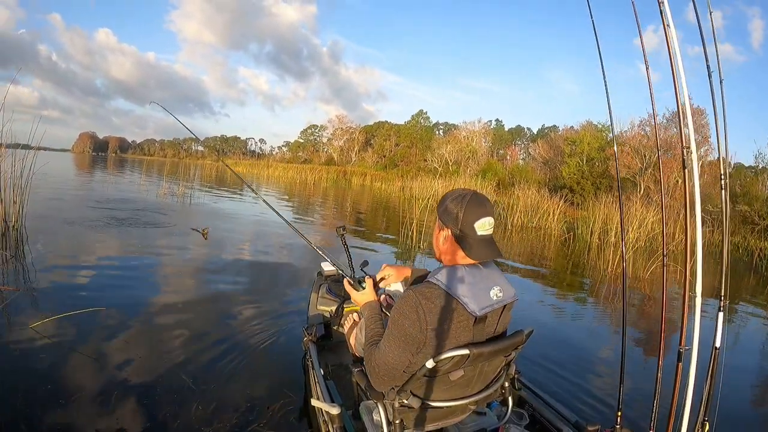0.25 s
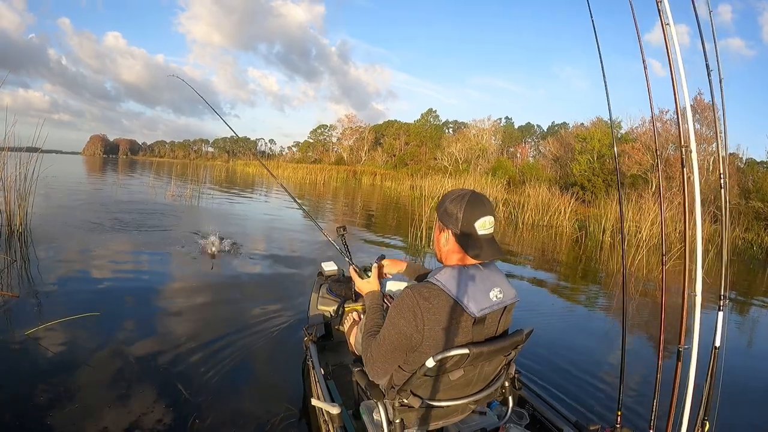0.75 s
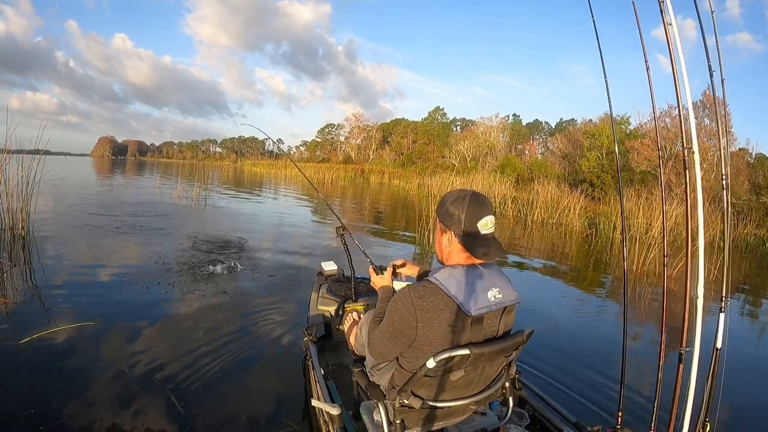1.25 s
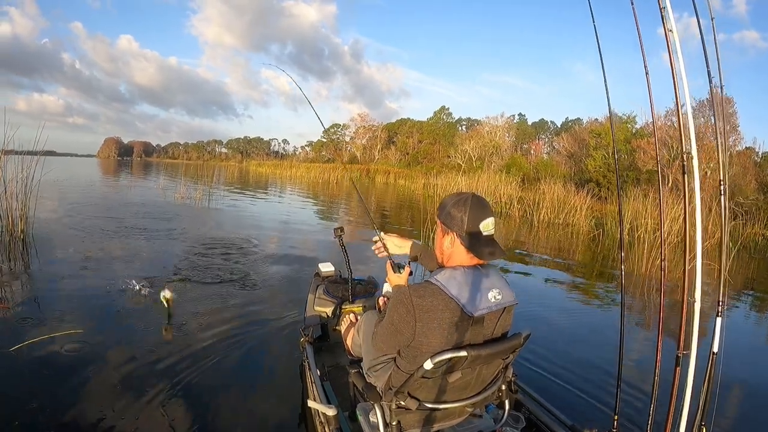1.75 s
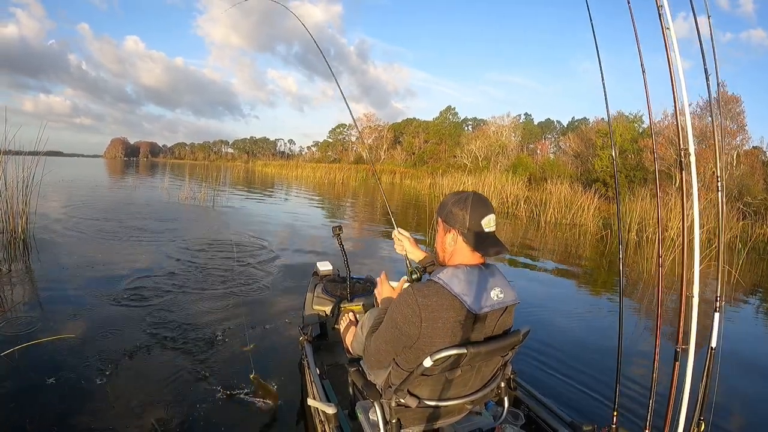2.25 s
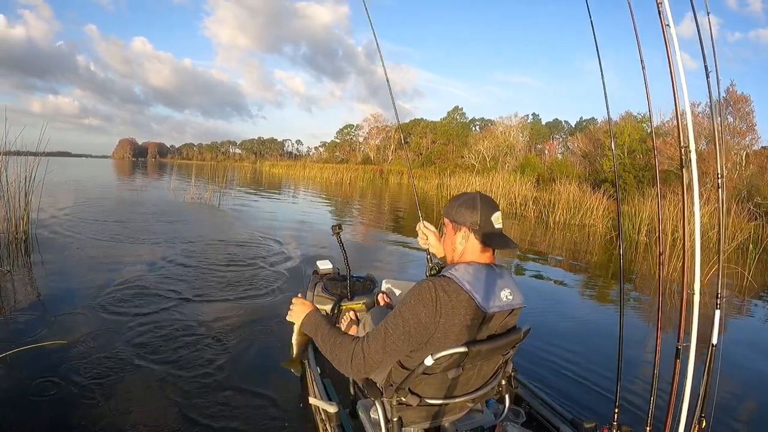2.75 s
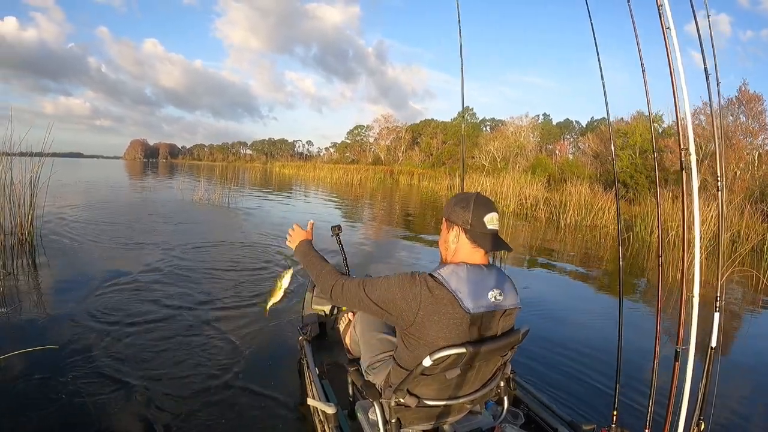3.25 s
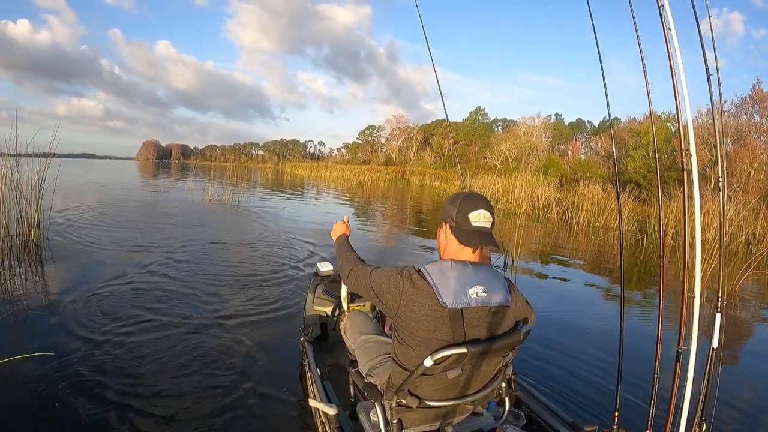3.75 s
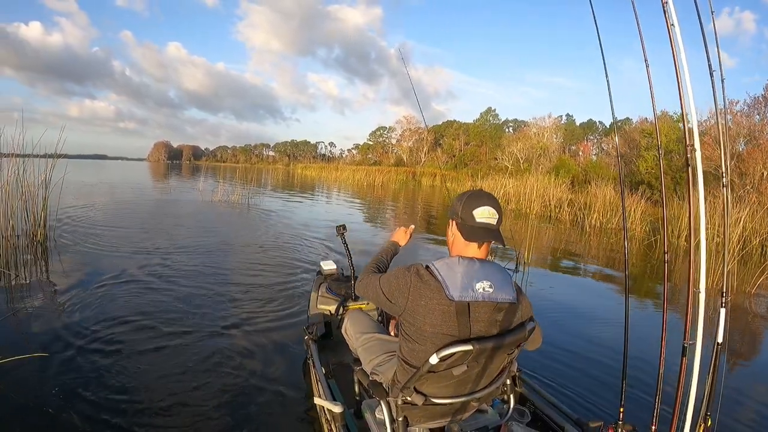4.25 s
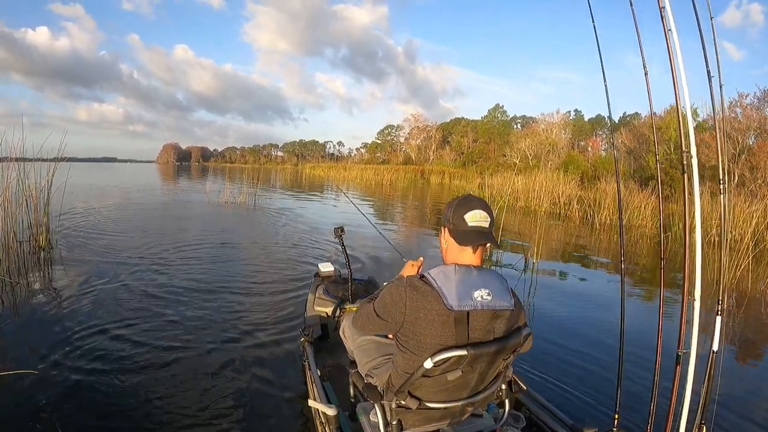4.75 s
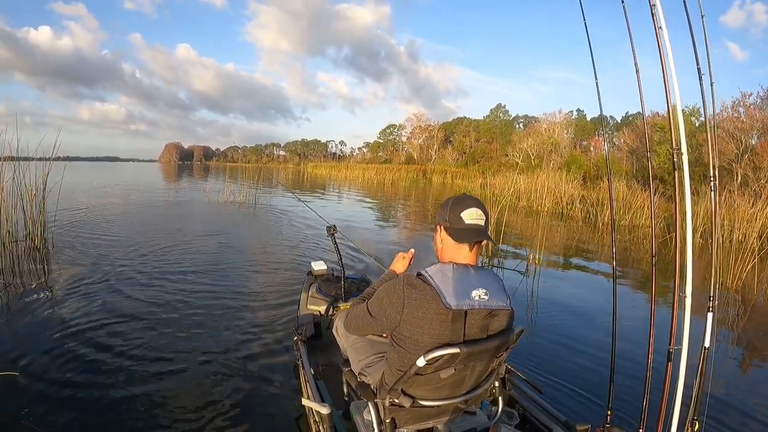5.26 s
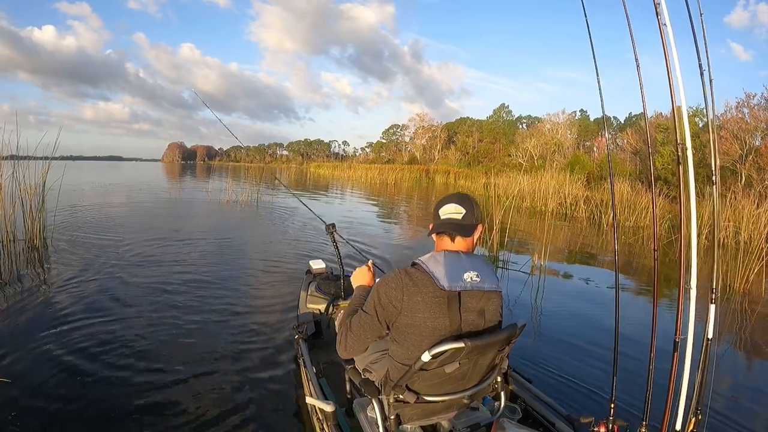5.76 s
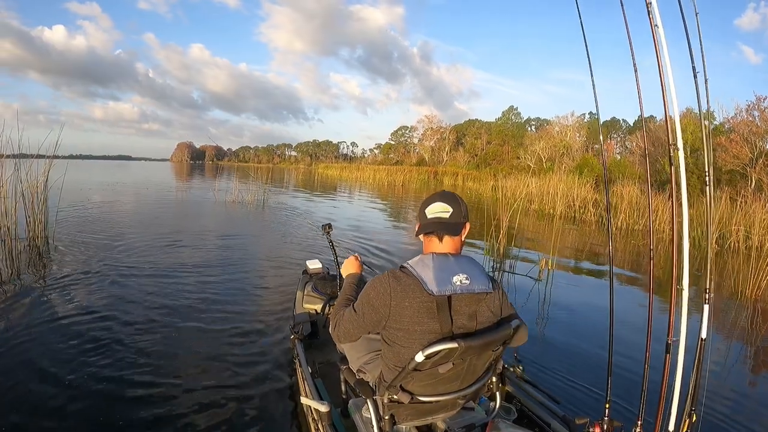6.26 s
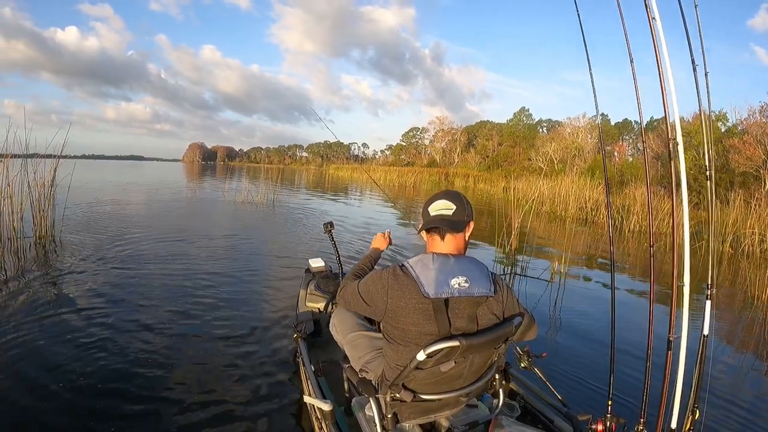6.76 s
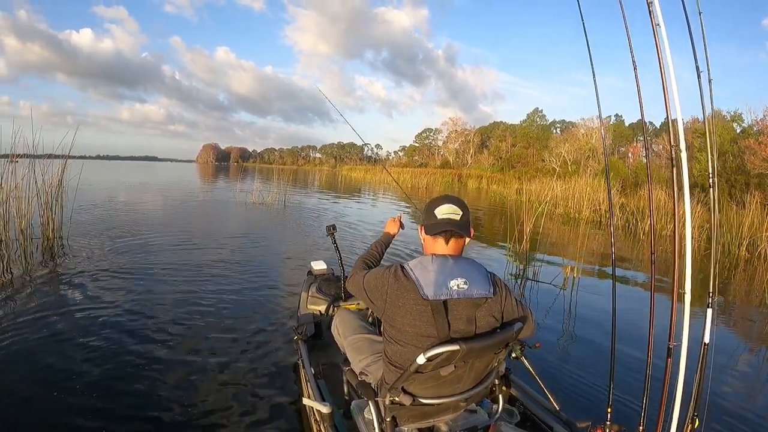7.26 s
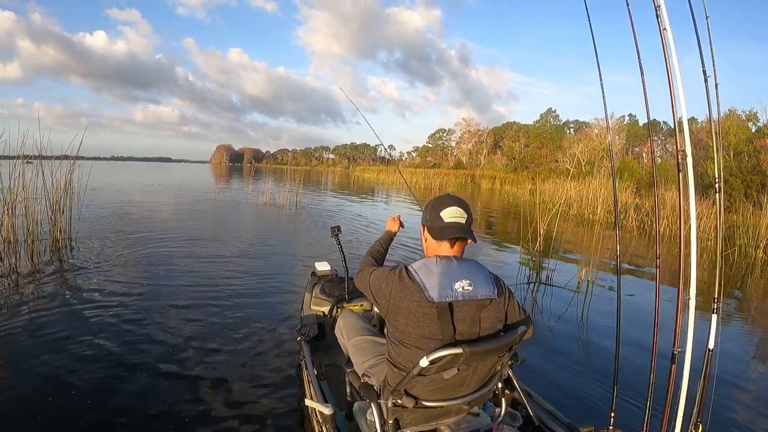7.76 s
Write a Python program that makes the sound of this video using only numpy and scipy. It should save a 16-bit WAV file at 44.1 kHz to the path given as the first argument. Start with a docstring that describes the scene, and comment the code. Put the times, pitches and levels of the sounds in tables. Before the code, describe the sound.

Thrashing spray, slaps and bubbling plops give way to a heavy boat thud, followed by hollow plastic knocks and rod clatter over low rumble.

```python
"""A hooked fish splashes toward a plastic kayak on a calm lake and is swung aboard with a thud. Spray and slaps
are shaped noise, and bubbles are dying sines that climb in pitch. Then rod and gear knock, scrape and tick on
the hollow hull, whose modes ring as dying sines. Filtered noise makes the low rumble and faint insects; short
thin tones sound faintly. The sound is wide at first and folds to the centre from about 3 s; the loudest blows
are limited."""
import sys
import numpy as np
from scipy import signal
from scipy.io import wavfile
from scipy.ndimage import uniform_filter1d, minimum_filter1d

SR = 44100
rng = np.random.default_rng(int(sys.argv[2]) if len(sys.argv) > 2 else 0)


def undo_db(level):
    """Turn decibels back into plain size, where 20 dB means ten times bigger."""
    steps = np.asarray(level, float) / 20
    return 10 ** steps


def generate_wav(sig):
    """Save sig (samples, or channels by samples) to the path in sys.argv[1] as 16-bit PCM at SR."""
    pcm = np.round(np.clip(np.atleast_2d(sig).T, -1, 1) * 32767).astype(np.int16)
    wavfile.write(sys.argv[1], SR, pcm)


N = 353241
T = np.arange(N) / SR  # time in seconds

# The fish thrashes and throws spray. Each row: start in seconds, time held in seconds, level in dB.
THRASHES = [(.41, 0.02, -30.5), (.58, 0.039, -31), (.72, 0.034, -29.5), (.85, 0.21, -27.5),
            (1.2, 0.27, -33), (1.71, 0.036, -38), (2.02, 0.012, -33), (2.17, 0.057, -36)]
# Steady wash behind the fish. Each row: time in seconds, level in dB.
WASH = [(0, -34.5), (1.5, -38.5), (1.65, -46), (2.4, -45.5), (2.62, -54)]
# Tone colour of the water. Each row: frequency in Hz, relative level per Hz in dB.
WATER_COLOUR = [(210, -41), (350, -4.5), (837, -1), (1680, 2.5), (3400, 2), (6900, -2.5), (12000, -18.5),
                (15500, -34)]


def spray():
    """Drops falling in clumps fizz as patchy noise, with swarms of small bubbles among them."""
    swarm = np.zeros(N)
    for hz in np.geomspace(1200, 7000, 16):
        bubble = plop(hz, cycles=rng.uniform(2.5, 8), rise=0.0505)
        swarm += signal.oaconvolve(grains(55, spread_db=5.5), bubble)[:N]
    clumps = undo_db(3.1 * evened(uniform_filter1d(rng.standard_normal(N), 500)))
    mist = evened(clumps * patches(3.2, frames=30, bins=4))
    drops = grains(1500, spread_db=12.0)
    fizz = colour(mist + 0.29 * drops, WATER_COLOUR)
    # the fish draws close between these seconds, and nearer spray is brighter
    fizz += np.interp(T, [1.2, 2.1], [0, 0.9]) * np.diff(fizz, prepend=0)
    power = efforts(THRASHES, rise_db_per_s=135, fall_db_per_s=49) + level(WASH) ** 2
    return np.sqrt(power) * evened(fizz + 0.61 * evened(swarm))


# Slaps and big drops on the water; the last rows are the wet fish slapping down as it lands aboard. # Each row:
# start in seconds, peak level before colouring in dB, favoured pitch in Hz.
SLAPS = [(0.444, -16, 2170), (0.5765, -14, 1700), (0.714, -19, 1610), (0.892, -10.5, 3420),
         (0.9593, -9, 4850), (0.985, -11, 3870), (1.4025, -5.5, 6640), (1.49, -21, 4830),
         (1.716, -13, 3770), (1.9054, -9, 2900), (1.968, -3.5, 2450), (2.0457, -8.5, 1670),
         (2.0587, -9.5, 1720), (2.1393, -16.5, 3400), (2.615, -14, 2100), (2.63, -8, 1780),
         (2.656, -14, 1300)]


def slaps():
    """Water struck flat, and the wet fish landing aboard, give short, broad bursts of noise."""
    return clicks(SLAPS, WATER_COLOUR, sharp=0.72, wide=0.99)


# Bubbles and drips. Each row: start in seconds, level before dying away in dB, starting pitch in Hz.
PLOPS = [(0.273, -16.5, 965), (0.625, -18, 1500), (0.713, -14, 407), (0.749, -11.5, 1030),
         (0.905, -14.5, 1250), (1.19, -18.5, 234), (1.219, -15, 317), (1.241, -5.5, 478), (1.257, -12, 540),
         (1.276, -15, 500), (1.424, -17, 2200), (1.506, -20, 1750), (1.531, -19.5, 1950),
         (1.555, -20, 2000), (1.598, -17.5, 1300), (1.625, -18, 1970), (1.73, -15.5, 1104),
         (1.754, -17, 1282), (1.843, -22.5, 1620), (2.274, -22, 1220), (2.744, -17.5, 1620),
         (2.9, -27, 1700)]


def plops():
    """Single bubbles ring and rise in pitch; the big, low ones climb most."""
    out = np.zeros(N)
    for s, db, hz in PLOPS:
        add(out, s, undo_db(db) * plop(hz, cycles=2.15 + hz / 900, rise=38 / hz))
    return out


def plop(hz, cycles, rise):
    """A bubble: a dying sine whose pitch climbs."""
    turns = np.arange(int(5 * cycles * SR / hz)) * hz / SR
    tone = np.sin(2 * np.pi * turns * (1 + rise * turns / cycles))
    soft_start = np.minimum(turns, 1) ** 2  # over the first cycle
    return tone * np.exp(-turns / cycles) * soft_start


# Blows on the hull. Each row: start in seconds, strength in dB, pitch favoured by the spot struck
# in Hz, level of the crack before colouring in dB.
KNOCKS = [(2.616, 3, 233, -29), (2.639, -2.5, 97, -19.5), (4.015, -8, 251, -37.5), (4.074, -18, 256, -55),
          (4.206, -18.5, 237, -58), (4.334, -14, 166, -48), (4.381, -14, 72.7, -76),
          (5.111, -13, 192, -32.5), (5.133, -9, 350, -29.5), (5.381, -16.5, 208, -44),
          (5.437, 0.5, 298, -14), (5.444, -0.5, 218, -26), (5.467, -4, 139, -28.5), (5.544, -8, 256, -27.5),
          (5.602, -3.5, 206, -25), (5.639, -4.5, 136, -19.5), (5.683, 1, 213, -16),
          (5.738, -7.5, 145, -30.5), (6.078, -8.5, 205, -38), (6.184, -5.5, 181, -25.5),
          (6.241, -4.5, 181, -33), (6.274, -16, 194, -23.5), (6.312, -7.5, 180, -28),
          (6.432, -7, 171.5, -24), (6.933, 1, 340, -10), (6.957, -0.5, 167, -40.5),
          (7.023, -7.5, 357, -29.5), (7.055, -14.5, 304, -36.5), (7.73, -23, 150, -35),
          (7.813, -12, 245, -28.5), (7.89, -11, 227, -32), (7.926, -11, 77.5, -37.5)]
# Low modes of the hull. Each row: frequency in Hz, relative level in dB, time to fall 60 dB in seconds.
HULL = [(69, 6, 0.1), (98, 0.5, 0.2), (143.6, 0.5, 0.17), (166, 2.5, 0.14), (205, 3.5, 0.11),
        (250.4, 2.5, 0.098), (292, 3, 0.075), (357.4, 3.5, 0.15), (402.4, -0.5, 0.14)]
# Upper modes of the thin deck. Each row: frequency in Hz, relative level in dB, 60 dB fall in seconds.
DECK = [(458, -2, 0.092), (548, -3.5, 0.094), (630, -2.5, 0.064), (801.7, -5.5, 0.08), (1030, -11.5, 0.063)]
# Modes of rod and holder. Each row: frequency in Hz, relative level in dB, 60 dB fall in seconds.
ROD = [(1601, 4.5, 0.049), (2305, -1.5, 0.02), (2950, -3.5, 0.018), (4920, -11.5, 0.034),
       (6700, -22, 0.012)]
# Tone colour of hard contact. Each row: frequency in Hz, relative level per Hz in dB.
CRACK_COLOUR = [(530, -32.5), (900, -1), (1380, -9.5), (2480, -9), (4080, -15), (5630, -19.5),
                (15500, -46.5)]
DECK_SHIFT = 0.061  # the deck's modes move up or down by at most this share


def knocks():
    """Each blow rings the low modes near its spot and the deck; a rattling crack also rings the rod."""
    out, cracks, t = np.zeros(N), np.zeros(N), np.arange(12000) / SR
    for s, db, hz, crack_db in KNOCKS:
        slow_start = 1 - np.exp(-t / 0.009)  # the bass builds up slowly
        add(out, s, undo_db(db) * peaked(ring(HULL, hz) * slow_start))

        chatter = rng.standard_normal(900) * swell(t[:900], 0.0034)  # the contact bounces for a moment
        deck = signal.oaconvolve(ring(DECK, shift=DECK_SHIFT), chatter)
        deck_db = 3.5 + db + 0.46 * (crack_db - db)  # harder contact, more upper ring
        add(out, s, undo_db(deck_db) * peaked(deck))

        flutter = evened(uniform_filter1d(rng.standard_normal(len(t)), 60))
        rattle = undo_db(2.05 * flutter) * rng.standard_normal(len(t))
        fade = swell(t, 0.003) ** 2 + 0.16 * swell(t, 0.013)
        burst = undo_db(crack_db) * fade * rattle
        add(cracks, s, burst)
        add(out, s, 0.58 * signal.oaconvolve(burst, ring(ROD, size=3000)))
    return out + 1.17 * colour(cracks, CRACK_COLOUR)


def ring(modes, near_hz=None, size=12000, shift=0.015):
    """Dying sines of a set of modes, strongest near near_hz, or weighted at random without it."""
    hz, db, t60 = np.transpose(modes)[:, :, None]
    if near_hz:
        weight = 0.19 + np.exp(-(np.log(hz / near_hz) / 0.28) ** 2)
    else:
        weight = rng.uniform(0.14, 1, hz.shape)
    t = np.arange(size) / SR
    # each ring is detuned slightly at random, so its tones are less still
    hz = hz * (1 + shift * rng.uniform(-1, 1, hz.shape))
    sign = rng.choice([-1, 1], hz.shape)
    sines = weight * sign * undo_db(db - 60 * t / t60) * np.sin(2 * np.pi * hz * t)
    x = sines.sum(0)
    return x / np.linalg.norm(x)


# Gear and clothing dragged about. Each row: start in seconds, time held in seconds,
# level of the hull's shaking in dB, level of the gritty rustle in dB.
DRAGS = [(2.635, 0.035, -27, -31.5), (3.12, 0.11, -49.5, -61), (3.455, 0.03, -44, -45),
         (3.62, 1.15, -41.5, -57.5), (5.13, 0.12, -24, -53), (5.45, 0.041, -18.5, -34.5),
         (5.57, 0.18, -17.5, -34.5), (5.86, 0.15, -31.5, -51), (6.11, 0.22, -24, -39.5),
         (6.66, 0.08, -51, -56), (6.96, 0.054, -22.5, -40), (7.14, 0.12, -33.5, -51),
         (7.45, 0.039, -60, -63), (7.81, 0.13, -32.5, -50)]
# Pitches in Hz favoured by the three places where gear rubs.
SPOTS_HZ = (202, 147, 340)


def scrapes():
    """Uneven slips shake the hull modes and rock the boat, while patchy grit hisses above."""
    low = np.zeros(N)
    for i, hz in enumerate(SPOTS_HZ):
        here = np.cos(np.pi * (1.3 * T - i / 3))  # the rubbed spot wanders
        body = ring(HULL, hz) + 0.45 * ring(DECK, shift=DECK_SHIFT)
        low += signal.oaconvolve(here * grains(400, spread_db=3.0), body)[:N]
    low = evened(low) + 0.48 * rocking()
    cloth = patches(3.5, frames=9, bins=8)
    grit = colour(0.35 * grains(600, spread_db=7.0) + cloth, CRACK_COLOUR)
    # a quiet resting level stays under the strokes
    shake = efforts(DRAGS, rise_db_per_s=347, fall_db_per_s=106) + undo_db(-52) ** 2
    rustle = efforts(DRAGS, rise_db_per_s=379, fall_db_per_s=139, axis=3) + undo_db(-66.5) ** 2
    return np.sqrt(shake) * low + np.sqrt(rustle) * grit


# Short rubs and ratchets of rod and reel. Each row: start in seconds, length in seconds, level in dB,
# slip rate setting (actual slips come evenly, about 1.2 times as many per second), favoured pitch in Hz.
RUBS = [(0, .11, -41, 890, 2150), (3.461, .11, -50, 70, 2150), (3.633, .07, -53, 39, 2100),
        (4.04, .18, -57, 39, 2100), (4.52, .116, -54, 22.5, 2100), (7.213, .062, -38, 800, 1150),
        (7.213, .062, -47, 960, 4850)]


def rubs():
    """Trains of regular slips of uneven strength sing in the modes of deck and rod."""
    out = np.zeros(N)
    for s, length, db, rate, hz in RUBS:
        held = ring(DECK + ROD, hz, size=400) * np.linspace(1, 0, 400)  # the hand damps the ring
        turns = np.cumsum(rate / SR * rng.uniform(0.49, 1.9, int(length * SR)))
        slips = np.diff(np.floor(turns))  # one slip at each whole turn
        slips = slips * (1 + 0.3 * rng.standard_normal(len(slips)))
        growing = (slips - slips.mean()) * undo_db(np.linspace(-3, 0, len(slips)))
        add(out, s, undo_db(db) * evened(signal.oaconvolve(growing, held)))
    return out


# Small ticks of reel, line and hooks.
# Each row: start in seconds, peak level before colouring in dB, favoured pitch in Hz.
TICKS = [(2.686, -22, 1500), (3.218, -26, 2120), (3.297, -36, 1800), (3.401, -34, 2050),
         (3.45, -15.5, 7350), (4.72, -34.5, 2350), (5.879, -27.5, 3204), (6.811, -28.5, 1590),
         (7.086, -35, 2200), (7.18, -24, 1571), (7.212, -28.5, 2000)]


def ticks():
    """Small hard parts touch and give short, pitched bursts of noise."""
    return clicks(TICKS, CRACK_COLOUR, sharp=3.2, wide=1.0)


def clicks(rows, spectrum, sharp, wide):
    """A short noisy burst with a faint tail, broad but strongest near its own pitch."""
    out, t = np.zeros(N), np.arange(6000) / SR
    for s, db, hz in rows:
        length = 0.008 - 0.0008 * db  # seconds; softer bursts last longer
        noise = rng.standard_normal(len(t))
        pitched = evened(signal.lfilter(*signal.iirpeak(hz, sharp, SR), noise))
        snap = pitched + wide * np.diff(noise, prepend=0)
        fade = swell(t, length / 9) ** 2 + 0.12 * swell(t, length / 2)
        add(out, s, undo_db(db) * peaked(snap * fade))
    return colour(out, spectrum)


# Faint thin tones. Each row: start in seconds, length in seconds, level before flutter in dB,
# starting pitch in Hz, final pitch in Hz.
THIN_TONES = [(2.19, .095, -46, 2660, 2655), (5.281, .035, -51, 5800, 4070),
              (7.823, 0.13, -44.5, 2900, 2950)]


def thin_tones():
    """Soft sines move from a starting to a final pitch while their level flutters."""
    out = np.zeros(N)
    for s, length, db, start_hz, end_hz in THIN_TONES:
        hz = np.geomspace(start_hz, end_hz, int(length * SR))
        flutter = evened(uniform_filter1d(rng.standard_normal(len(hz)), 200))
        fade = np.sqrt(np.hanning(len(hz)))
        tone = np.sin(2 * np.pi * np.cumsum(hz) / SR)
        add(out, s, undo_db(db + 3.5 * flutter) * fade * tone)
    return out


# Distant rumble. Each row: time in seconds, level in dB.
RUMBLE_LEVEL = [(0, -30.5), (2.8, -30), (3.3, -33.5), (8.01, -33.5)]
# Tone colour of the rumble. Each row: frequency in Hz, relative level per Hz in dB.
RUMBLE_COLOUR = [(20, -17), (59, -0.5), (144, -4), (245, -9.5), (505, -27), (667, -23), (1410, -32),
                 (1770, -47), (5690, -52.5), (15500, -74.5)]
# Dull drone in the rumble: pitch in Hz, width of each filter pass in Hz, level before its ebb in dB.
DRONE = (68.5, 9.8, -34.5)
# Thin band of insects: pitch in Hz, width of each filter pass in Hz, level in dB.
INSECTS = (3550, 500, -64)


def ambience():
    """Far rumble with a wavering drone, and a thin band of insects, all from filtered noise."""
    rumble = level(RUMBLE_LEVEL) * evened(colour(rng.standard_normal(N), RUMBLE_COLOUR))
    hz, width, db = DRONE
    ebb = np.interp(T, [0, 3, 8], undo_db([2.5, 0, -3]))
    drone = ebb * undo_db(db) * band(hz, width)
    hz, width, db = INSECTS
    return rumble + drone + undo_db(db) * band(hz, width)


def band(hz, width):
    """Noise in one fuzzy resonance, filtered twice."""
    b, a = signal.iirpeak(hz, hz / width, SR)
    once = signal.lfilter(b, a, rng.standard_normal(N))
    return evened(signal.lfilter(b, a, once))


def rocking():
    """Deep, lumpy noise of the whole boat moving."""
    sos = signal.butter(2, [25, 70], "band", fs=SR, output="sos")
    return evened(signal.sosfilt(sos, rng.standard_normal(N)))


def grains(per_s, spread_db):
    """Random clicks, a few of them large."""
    size = undo_db(spread_db * np.minimum(rng.exponential(1, N), 4)) * rng.standard_normal(N)
    return evened(size * (rng.random(N) < per_s / SR))


def patches(spread_db, frames, bins):
    """Noise whose short-time spectrum has random loud and quiet patches."""
    z = signal.stft(rng.standard_normal(N), nperseg=256)[2]
    field = rng.standard_normal(z.shape[::-1]).T
    field = uniform_filter1d(field, frames, axis=1)  # smooth in time
    field = evened(uniform_filter1d(field, bins, axis=0))  # smooth in pitch
    return evened(signal.istft(z * undo_db(spread_db * field), nperseg=256)[1][:N])


def efforts(rows, rise_db_per_s, fall_db_per_s, axis=2):
    """Power over time of strokes that rise, hold and die away; axis picks the dB column."""
    t, rows = T[::100], np.array(rows)[:, :, None]
    start, held = rows[:, 0], rows[:, 1]
    early = np.maximum(start - t, 0)
    late = np.maximum(t - start - held, 0)
    db = rows[:, axis] - rise_db_per_s * early - fall_db_per_s * late
    return np.interp(T, t, (undo_db(db) ** 2).sum(0))


def level(rows):
    """Gain over time from rows of seconds and dB, faded to silence outside the table."""
    s, db = np.transpose(rows)
    inside = np.minimum(T - s[0], s[-1] - T)
    return undo_db(np.interp(T, s, db)) * np.clip(inside / 0.024 + 1, 0, 1)


def read(points, hz):
    """Reads a spectrum table on a log-frequency axis."""
    f, value = np.transpose(points)
    return np.interp(np.log(hz + 1), np.log(f + 1), value)


def colour(x, spectrum):
    """Filters with the given spectrum, without sounding ahead of time (minimum phase)."""
    log_gain = np.log(undo_db(read(spectrum, abs(np.fft.fftfreq(8192, 1 / SR)))) + 1e-5)
    taps = np.fft.ifft(np.exp(np.conj(signal.hilbert(log_gain)))).real[:4096]
    return signal.oaconvolve(x, taps / np.linalg.norm(taps))[:len(x)]


def swell(t, rise):
    """Quick rise and fall, peak 1 at t = rise."""
    return t / rise * np.exp(1 - t / rise)


def evened(x):
    """Scales to rms 1."""
    return x / np.sqrt(np.mean(x ** 2) + 1e-20)


def peaked(x):
    """Scales to peak 1."""
    return x / abs(x).max()


def add(mix, s, sound):
    """Mixes a sound in at time s."""
    part = mix[round(s * SR):][:len(sound)]
    part += sound[:len(part)]


# Loudness between the ports. Each row: frequency in Hz, how much louder the left is in dB.
LEFT_LOUDER = [(60, 1), (240, 3), (950, 1), (3770, 2.5), (15000, 6.5)]
# Likeness of the ports. Each row: frequency in Hz, likeness from 0 to 1.
LIKENESS = [(60, 0.99), (240, 0.94), (950, 0.33), (3770, 0.89), (15000, 0.56)]
# Phase between the ports. Each row: frequency in Hz, phase by which the shared left sound leads in radians.
LEFT_LEAD = [(0, 0.27), (780, -0.42), (15200, 0.18)]
# The landing fish jolts the ports unalike: time in seconds, half length in seconds,
# share of likeness lost (clipped at none left), how much louder the left becomes in dB.
THUD = (2.68, 0.064, 2.2, 0.51)
# Stereo width. Each row: time in seconds, share of the left-right difference kept.
WIDTH = [(0, 0.74), (2.85, 0.91), (3.1, 0.14), (3.5, 0)]


def scene():
    """Two microphone ports hear the mix partly alike, with the left louder."""
    left = spray() + slaps() + plops() + knocks() + scrapes() + rubs() + ticks() + thin_tones() + ambience()
    thud_s, half_s, likeness_lost, louder_db = THUD
    hz, t, z = signal.stft(left, SR, nperseg=512)
    jolt = np.exp(-((t - thud_s) / half_s) ** 4)
    same = np.clip(read(LIKENESS, hz)[:, None] * (1 - likeness_lost * jolt), 0, 1)
    random_phase = np.exp(2j * np.pi * rng.random(z.shape[::-1]).T)
    other = abs(z) * random_phase * np.sqrt(2)
    right = same * z + np.sqrt(1 - same ** 2) * other
    right = right * np.exp(-1j * read(LEFT_LEAD, hz))[:, None]
    right = right / undo_db(read(LEFT_LOUDER, hz)[:, None] + louder_db * jolt)
    right = signal.istft(right, SR, nperseg=512)[1][:N]
    lurch = undo_db(-12.5) * rocking() * np.interp(T, t, jolt)
    left, right = left + lurch, right - 0.33 * lurch  # opposite in the two ports
    wide = np.interp(T, *np.transpose(WIDTH))
    return np.array([left, wide * right + (1 - wide) * left])


def band_limit(x):
    """A steep low-pass at the top of the band."""
    return signal.sosfilt(signal.butter(12, 15640, fs=SR, output="sos"), x)


def record(dry):
    """A quick limiter holds the loudest blows near full scale; what slips past clips; treble is cut."""
    loudest = -minimum_filter1d(-abs(dry).max(0), size=700)  # highest peak nearby
    peak = uniform_filter1d(loudest, size=500)
    held = dry / np.maximum(peak / 1.15, 1)
    clipped = np.clip(held, -1, 1)
    dull = signal.sosfilt(signal.butter(12, 14800, fs=SR, output="sos"), clipped)
    return band_limit(dull)


dry = scene()
out = record(dry)
generate_wav(out)
```